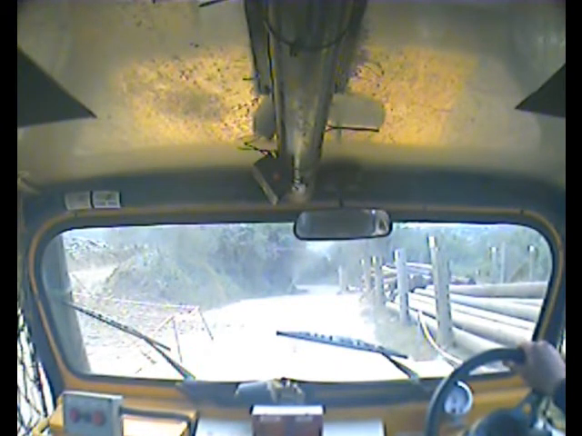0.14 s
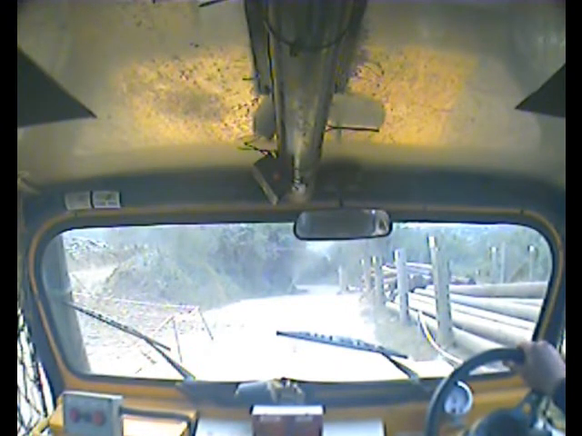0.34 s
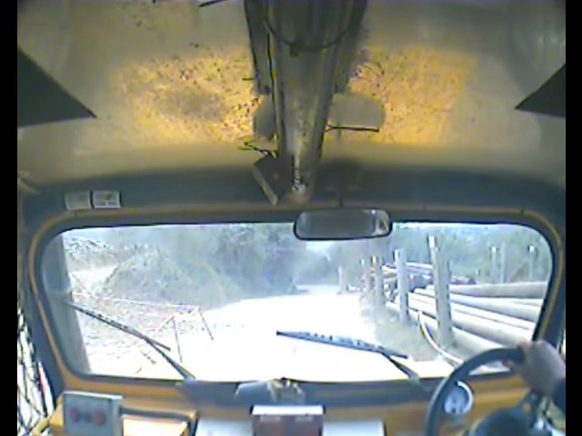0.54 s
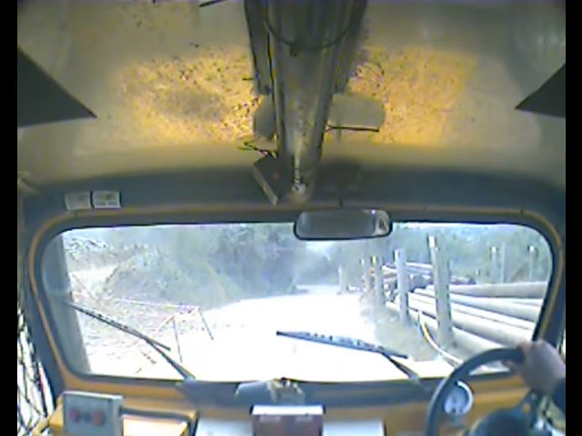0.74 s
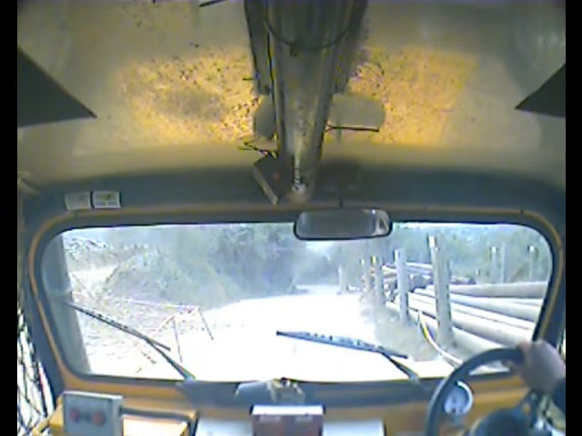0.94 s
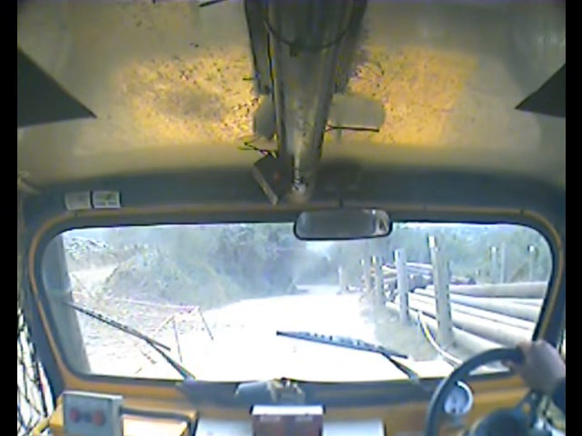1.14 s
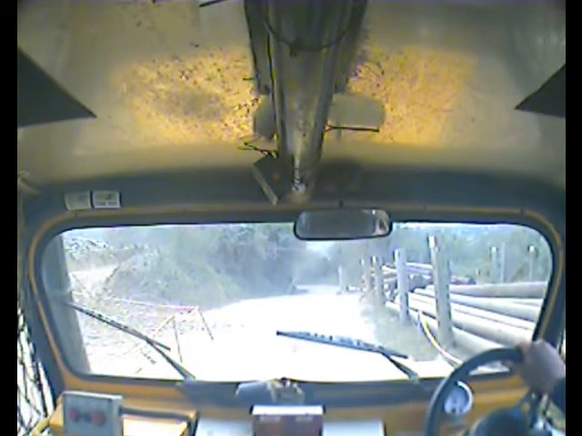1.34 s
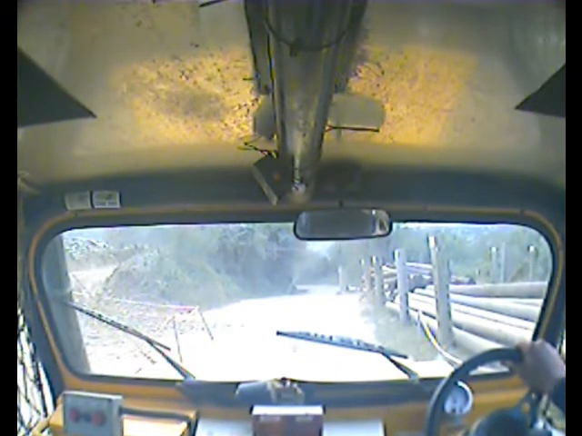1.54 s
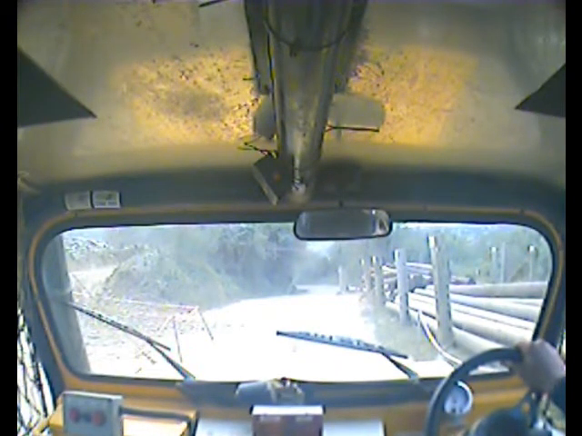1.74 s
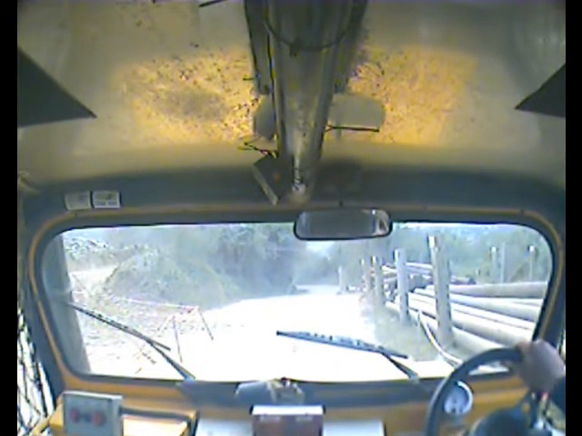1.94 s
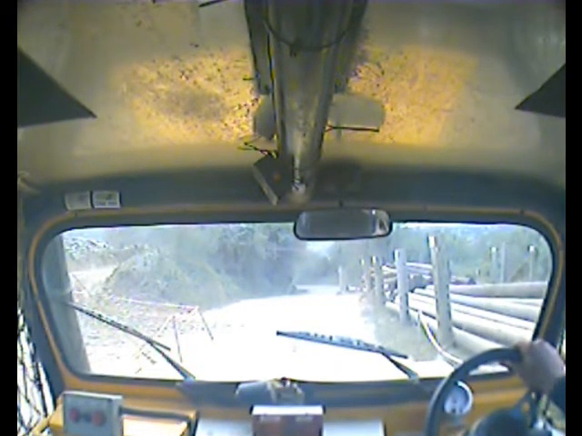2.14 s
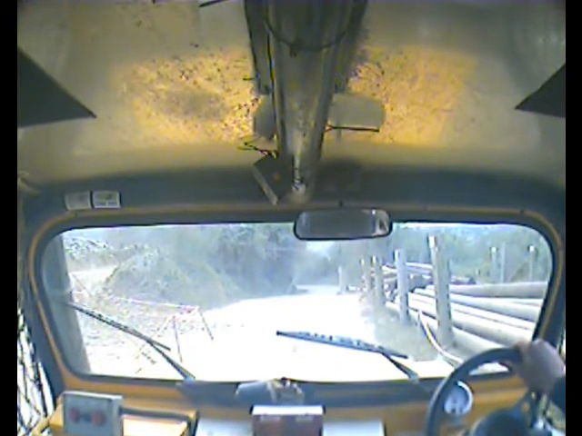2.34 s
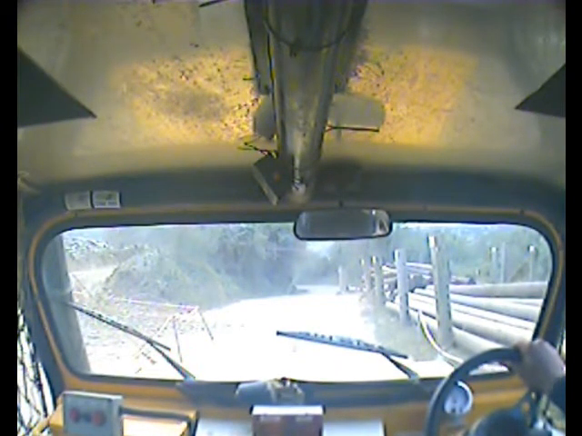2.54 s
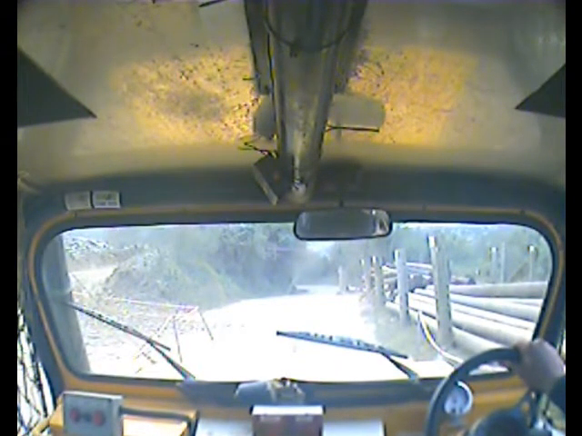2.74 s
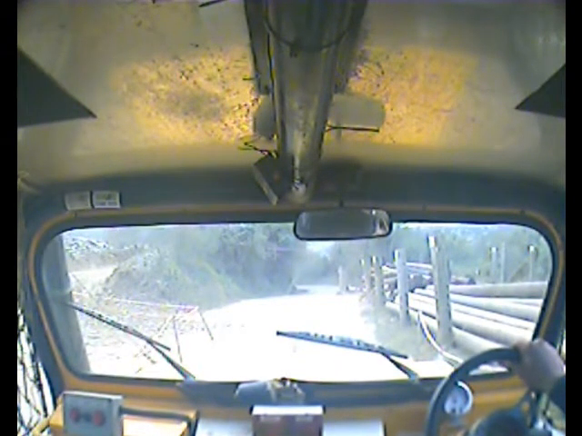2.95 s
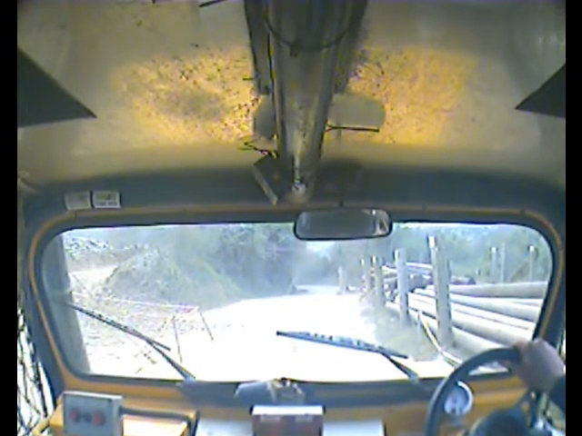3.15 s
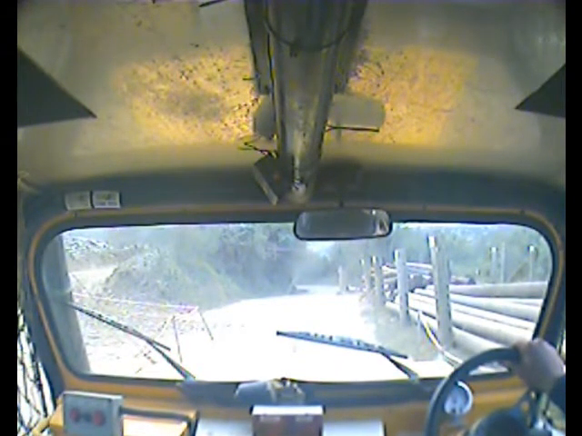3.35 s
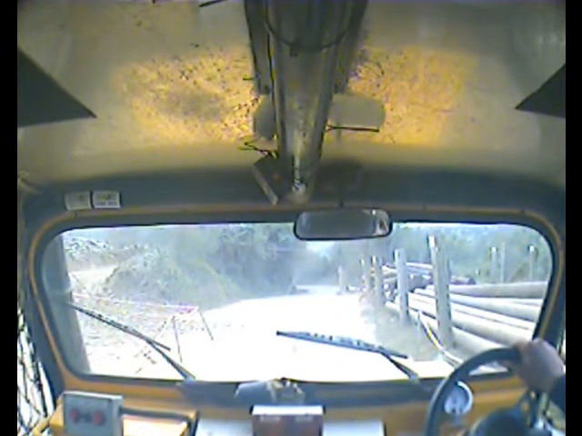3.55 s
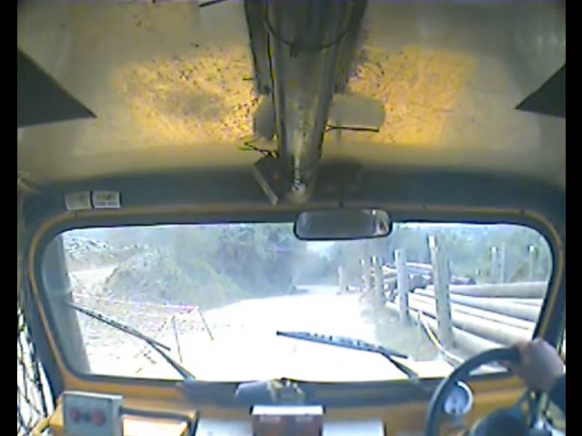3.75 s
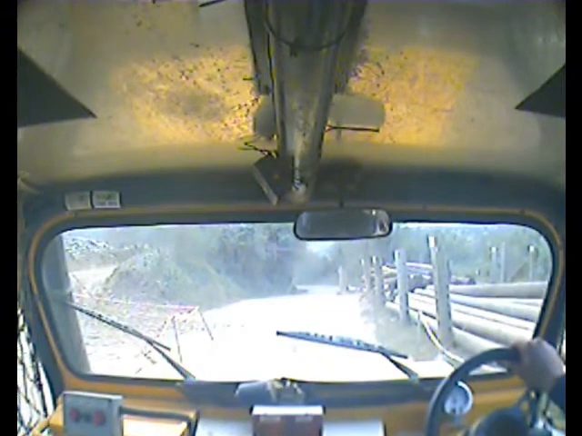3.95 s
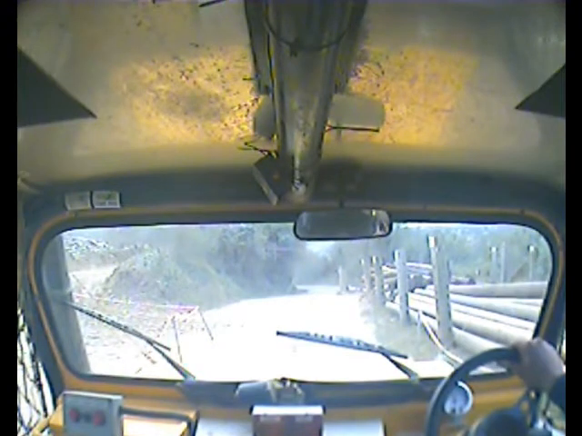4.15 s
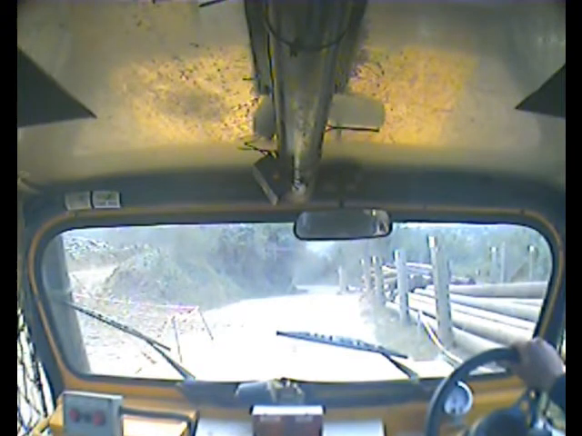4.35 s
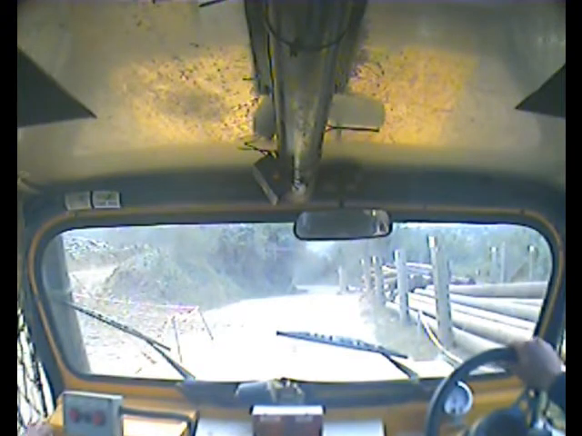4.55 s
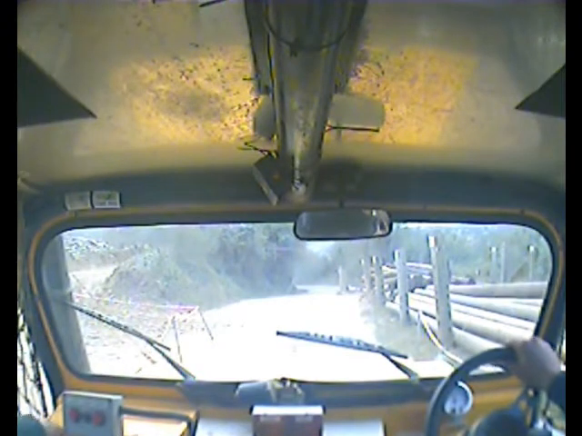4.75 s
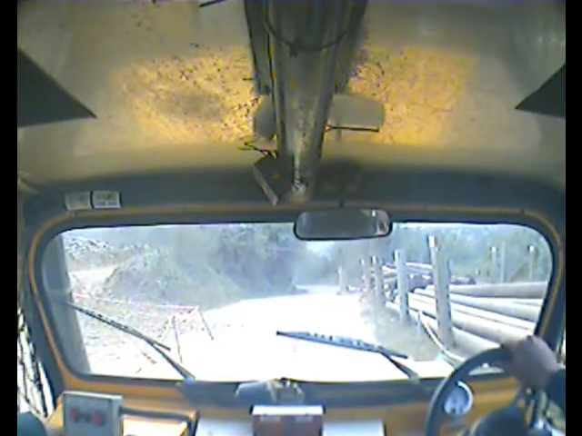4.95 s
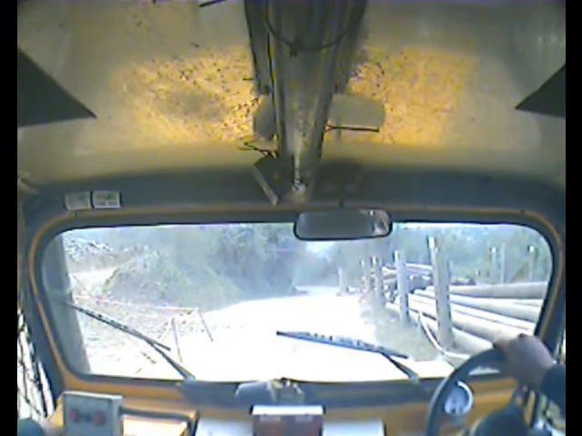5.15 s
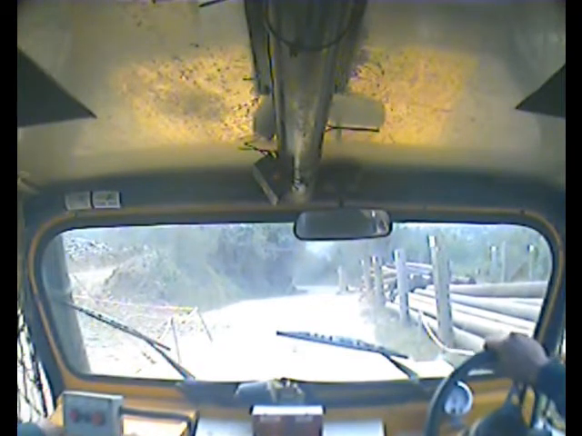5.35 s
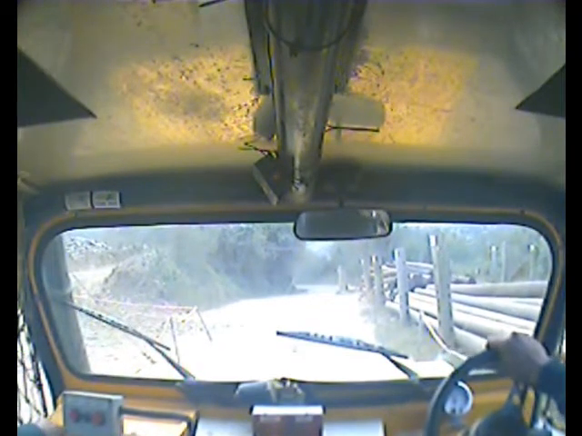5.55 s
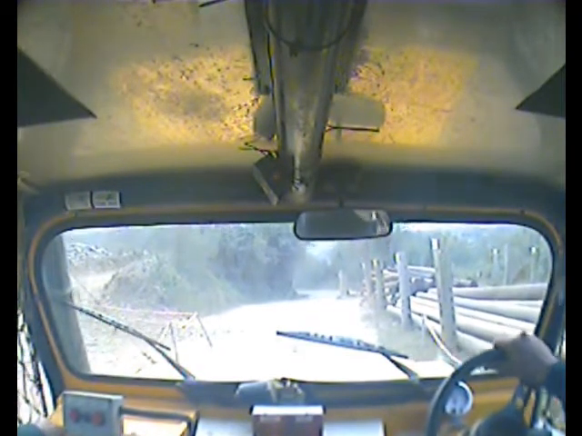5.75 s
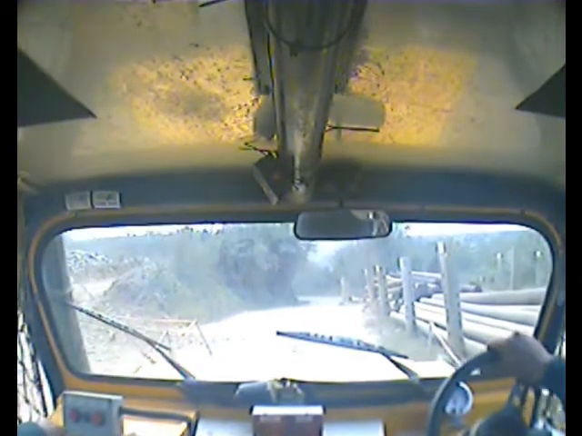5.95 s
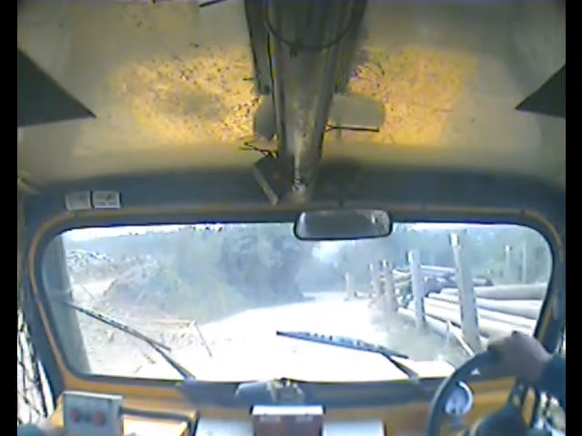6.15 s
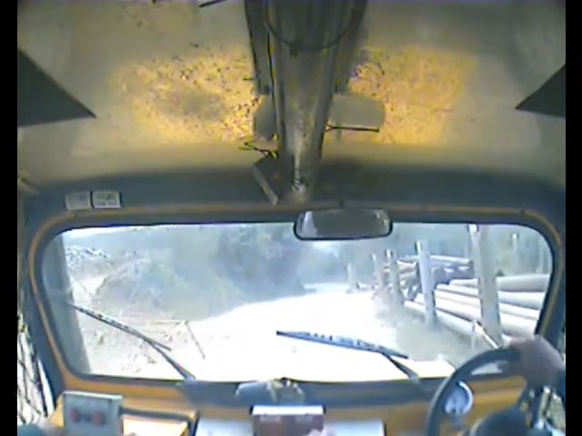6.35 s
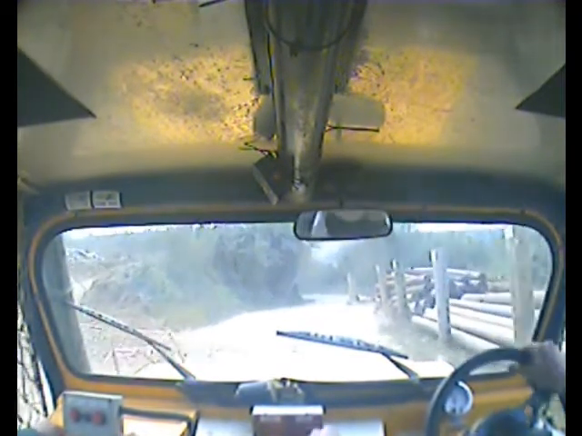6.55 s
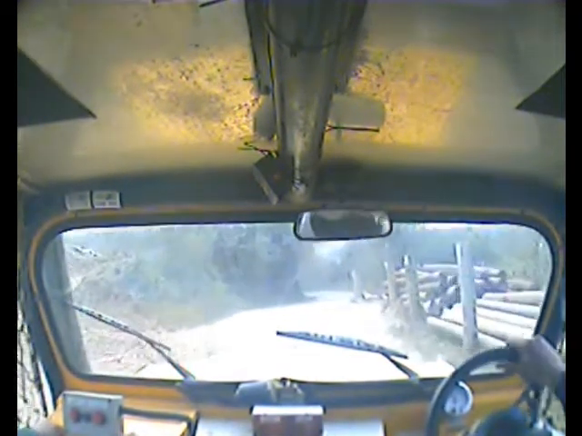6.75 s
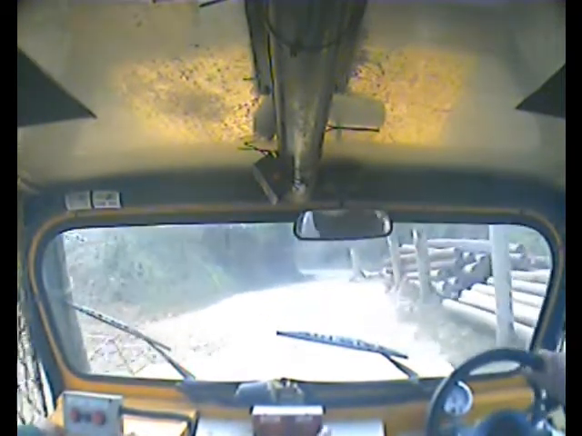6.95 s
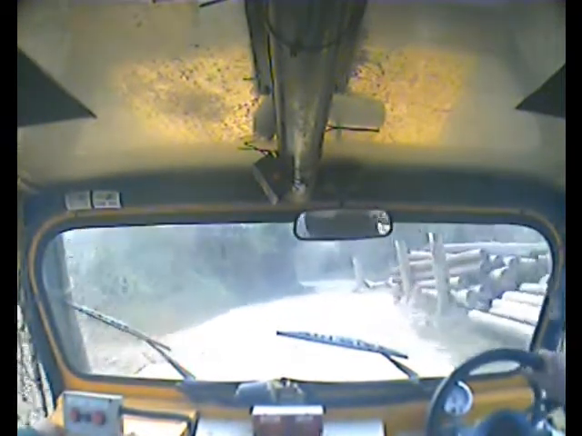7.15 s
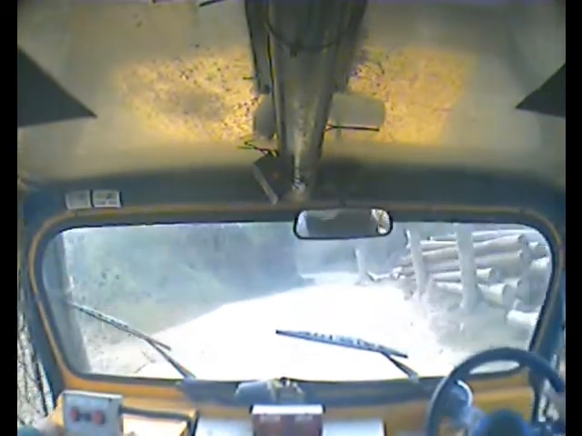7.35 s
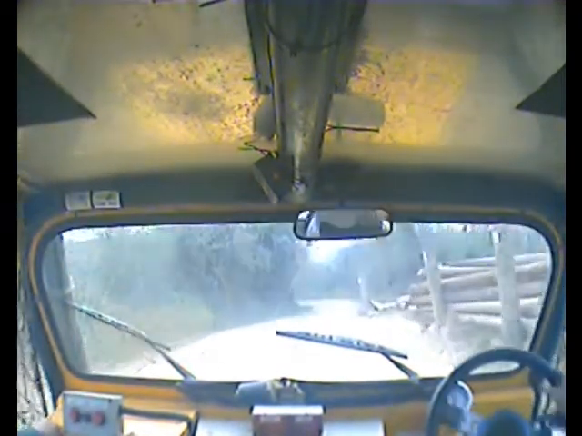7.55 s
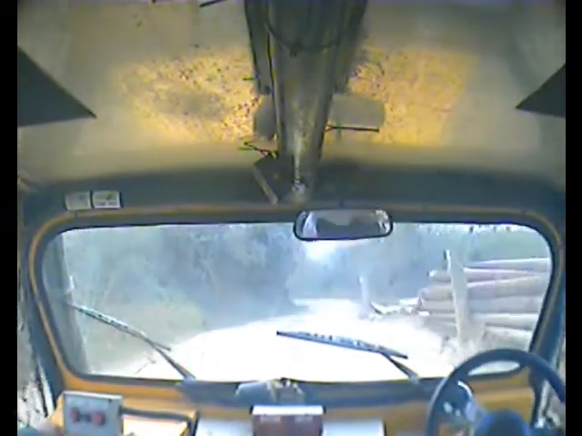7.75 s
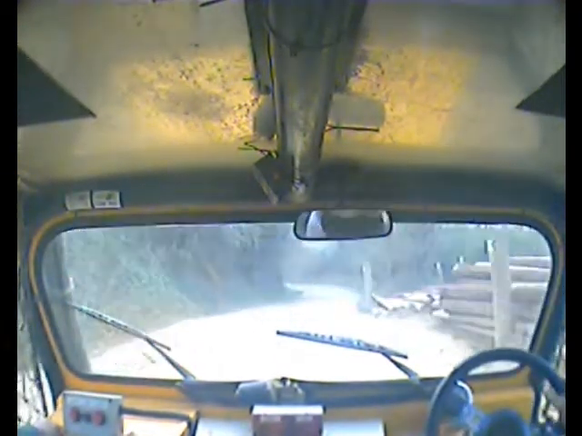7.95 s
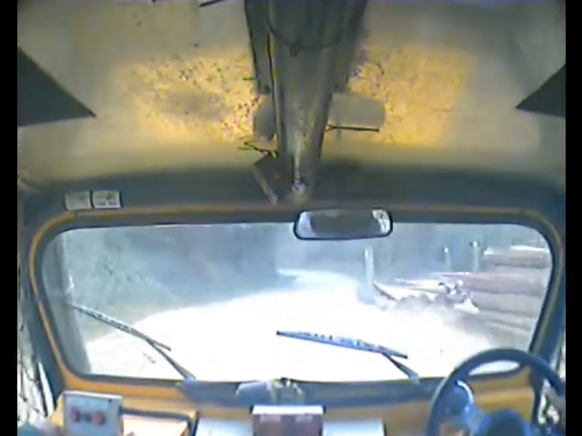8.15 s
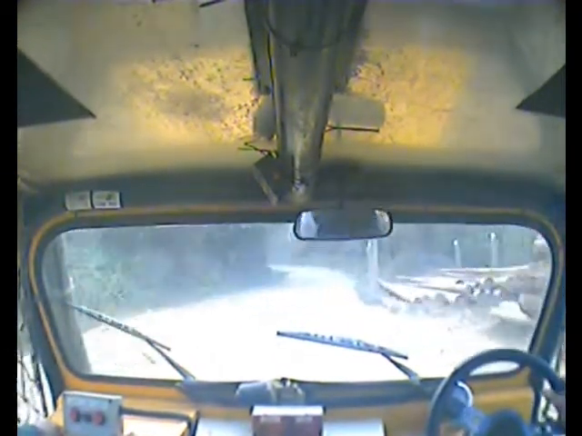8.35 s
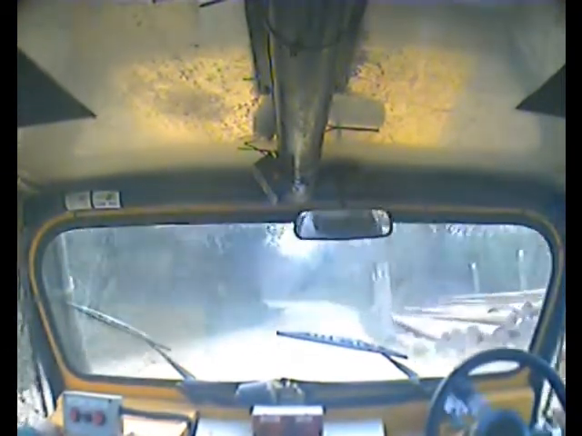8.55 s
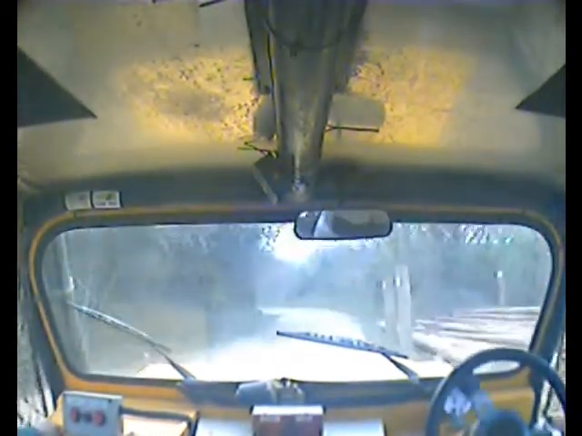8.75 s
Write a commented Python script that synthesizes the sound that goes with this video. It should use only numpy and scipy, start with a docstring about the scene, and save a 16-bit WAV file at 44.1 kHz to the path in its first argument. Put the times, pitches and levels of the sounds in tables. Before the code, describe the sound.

The microphone sits inside the bare, boxy cab of an eight-cylinder race car. From 0 to 5 seconds the engine idles fairly quietly, low and lumpy, with small growling throttle swells around 0.7 and 1.4-1.7 seconds before settling. Thin motor and pump whines hover above it, more noticeable from about 2.5 seconds. At 5.0 a short, grating gear clunk rings the casing. Around 5.5 the engine leaps into a loud roar, with a hard metallic clack and body thump near 5.7. Its pitch sags towards 6.4, snarls, then climbs strongly from 6.9 to a high, raspy peak around 8.2-8.4 before dropping slightly, still loud, at the end near 8.8. Low body boom swells with speed. Irregular dry metal rattles and bumps cluster around 6.4-7.4 and 8.1-8.6. The loudest moments clip harshly, and the extreme treble is cut off.

```python
"""Inside the bare cab of an eight-cylinder race car: the engine ticks over with two blips of throttle,
a gear clunks in, then it revs hard and pulls away over rough dirt. Engine orders are wavering sines;
boom, roar, rasp and hiss are noises coloured by throttle and cab. Wandering sines whine for a pump, noise
bursts clatter as loose metal, a noise burst shaped by casing modes is the clunk, and the input overloads."""
import sys
import numpy as np
from scipy import signal
from scipy.fft import rfft, irfft
from scipy.io import wavfile
from scipy.ndimage import uniform_filter1d, map_coordinates

SR = 44100
rng = np.random.default_rng(int(sys.argv[2]) if len(sys.argv) > 2 else 0)


def elevation(decibels):
    """Turn decibel levels (scalar or array-like) into linear amplitude ratios."""
    levels = np.asarray(decibels, float)
    return 10 ** (levels / 20)


def unload_wav(signal):
    """Save mono or channel-first audio to the path in sys.argv[1] as 16-bit WAV at rate SR, clipped to [-1, 1]."""
    wavfile.write(
        sys.argv[1],
        SR,
        np.round(np.clip(np.atleast_2d(signal).T, -1, 1) * 32767).astype(np.int16),
    )


N = 388521

# colour of the engine roar, idling and under load: (frequency [Hz], relative density [dB per Hz])
ROAR_IDLE_COLOUR = [(65, -22), (110, -5.5), (183, -6.5), (282, -12), (350, -7), (426, -12.5), (513, -7.5),
                    (605, -16), (767, -10), (924, -10), (994, -9.5), (1120, -20), (1300, -16.5),
                    (1690, -51), (2860, -120)]
ROAR_LOAD_COLOUR = [(65, -38), (110, -9), (141, -9), (177, -0.5), (215, -14.5), (262, -1.5), (291, -4),
                    (346, -1), (477, -6.5), (535, -5.5), (678, -7.5), (963, -6.5), (1300, -18), (1690, -28),
                    (2860, -120)]


def evened(x):
    """Scales to rms 1."""
    return x / np.sqrt(np.mean(x ** 2) + 1e-20)


def read(points, hz):
    """Reads a spectrum on a log-frequency axis."""
    f, value = np.transpose(points)
    return np.interp(np.log(hz + 1), np.log(f + 1), value)


def curves(rows, t):
    """Joins table rows by straight lines in time."""
    s, *columns = np.transpose(rows)
    return [np.interp(t, s, c, left=c[0], right=c[-1]) for c in columns]


def swells(rows, t):
    """Sum of bell-shaped lifts in dB."""
    return sum(db * np.exp(-((t - s) / half) ** 2) for s, half, db in rows)


def wander(hz):
    """Slow random drift of about rms 1 up to about hz."""
    knots = rng.standard_normal(int(N / SR * hz * 2) + 4)
    coarse = np.arange(0, N + 64, 64)
    drift = map_coordinates(knots, [coarse / SR * hz * 2 + 1], order=3)
    return np.interp(np.arange(N), coarse, drift)


def add(mix, s, sound):
    """Mixes a sound in at time s."""
    part = mix[round(s * SR):][:len(sound)]
    part += sound[:len(part)]


def resonances(modes, hz):
    """Bell curves of (frequency [Hz], width [Hz], peak height) at each frequency, summed."""
    return sum(height / (1 + (2 * (hz - f) / width) ** 2) for f, width, height in modes)


def cab_db(hz):
    """Lift in dB that the air and panel resonances of the cab give at each frequency."""
    # cab resonances: (frequency [Hz], width [Hz], lift [dB])
    cab_modes = [(43, 7.6, 2.5), (78, 8.8, 2.5), (164.3, 5.1, 4), (183.4, 24, 12.5), (325, 10, 3.5),
                 (523, 20, 2), (795, 40, 2.5), (1050, 44, 1), (1864, 43, 7), (4180, 78, 5.5),
                 (5270, 250, 1.5), (6900, 150, 4.5), (425.5, 17, 4.5), (651, 17, 5.5), (1180, 15, 7),
                 (1220, 32, -0.5), (1680, 40, 4.5)]
    return resonances(cab_modes, hz)


def effort_db(t):
    """Engine effort in dB over idle."""
    # engine effort: (time [s], level over idle [dB])
    effort = [(0, 0), (5.3, 0), (5.42, 1), (5.54, 9), (5.63, 14.5), (5.85, 13.5), (6.3, 14), (6.5, 15),
              (6.6, 13), (6.85, 13.5), (7.15, 17), (7.3, 20), (7.55, 17.5), (7.7, 18), (8.0, 20), (8.2, 22),
              (8.4, 20.5), (8.55, 21.5), (8.72, 17.5), (8.81, 22)]
    return curves(effort, t)[0]


def throttle(t):
    """Share of open throttle, 0-1, taken from the effort."""
    wide_open_db = 14
    return np.clip(effort_db(t) / wide_open_db, 0, 1)


def blips_db(t):
    """Lift in dB from the dabs of throttle that make the intake growl."""
    # dabs of throttle: (time [s], half length [s], growl lift [dB])
    dabs = [(0.744, 0.1, 5.5), (1.408, 0.11, 5.5), (1.65, 0.11, 5)]
    return swells(dabs, t)


def snarl_db(t):
    """Lift or dip in dB as the upper roar snarls or dulls for a while."""
    # snarls: (time [s], half length [s], lift [dB])
    snarl_moments = [(5.54, 0.08, 1), (5.72, .08, 1.5), (6.48, 0.074, 8), (7.05, 0.15, -2),
                     (7.3, 0.076, -1.5), (7.55, 0.15, 1.5), (7.95, 0.31, 6), (8.5, 0.18, -0.5),
                     (8.25, 0.074, -4)]
    return swells(snarl_moments, t)


def roar_level_db(t):
    """Level of the roar, which follows the full effort and part of each blip."""
    return -38 + effort_db(t) + 0.4 * blips_db(t)


def colour_db(idle, load, hz, t, snarls):
    """Spectrum between idle and load, lifted by the cab and, for engine roar, by snarl and growl."""
    snarl_hz, growl_hz, growl_width_hz = 580, 328, 160
    open_share = throttle(t)
    engine_db = read(idle, hz) * (1 - open_share) + read(load, hz) * open_share
    snarl = snarls * snarl_db(t) / (1 + (snarl_hz / (hz + 1)) ** 4)
    growl = snarls * blips_db(t) / (1 + (2 * (hz - growl_hz) / growl_width_hz) ** 4)
    return engine_db + cab_db(hz) + snarl + growl


def noise(idle, load, patchy_db, size, snarls=False):
    """Noise whose colour follows the throttle, with drifting patches, evened to rms 1."""
    hop = size // 4
    frames, hz = N // hop + 5, np.fft.rfftfreq(size, 1 / SR)
    real, imaginary, patches = rng.standard_normal((frames, len(hz), 3)).T
    patches = uniform_filter1d(patches, size=9, axis=0)
    patches = evened(uniform_filter1d(patches, size=5, axis=1))
    frame_s = np.arange(frames) * hop / SR
    colour = elevation(colour_db(idle, load, hz[:, None], frame_s, snarls))
    colour /= np.sqrt((colour ** 2).sum(0))  # equal power in every frame
    z = (real + 1j * imaginary) * colour * elevation(patchy_db * patches)
    return evened(signal.istft(z, nperseg=size, noverlap=size - hop)[1][:N])


def tone(turns, db, waver_db, waver_hz, slip):
    """A sine on a phase track whose phase drifts [rad] and whose level wavers, dipping deeper than it rises."""
    level_db = db + waver_db * np.minimum(wander(waver_hz), 1)
    phase = 2 * np.pi * (turns + rng.random()) + slip * wander(waver_hz)
    return np.sqrt(2) * elevation(level_db) * np.sin(phase)


def pump(t):
    """Thin whines of the pump and fan motors: sines with small drifts of phase and level."""
    # steady motor tones: (frequency [Hz], level [dB])
    motor_tones = [(748, -54.5), (996, -51), (1494, -60.5), (2740, -58), (3068, -64)]
    # two wandering pump tones: (time [s], frequency [Hz], level [dB])
    low_whine = [(0, 2773, -68), (2.2, 2756, -66), (3, 2770, -53.5), (4, 2770, -50.5), (4.7, 2775, -51),
                 (4.95, 2750, -63), (5.2, 2770, -53), (5.5, 2760, -61)]
    high_whine = [(0, 2870, -71), (1.3, 2910, -68), (2.8, 2880, -52), (3.9, 2860, -61), (5.5, 2880, -59)]
    out = sum(tone(hz * t, db, 0.78, 3.2, 0.27) for hz, db in motor_tones)
    for rows in (low_whine, high_whine):
        hz, db = curves(rows, t)
        out += tone(np.cumsum(hz) / SR, db, 0.9, 6, 0.17)
    return out


def clunk():
    """The gear dogs grate for a moment and ring the gearbox casing."""
    # gearbox casing modes: (frequency [Hz], width [Hz], level [dB])
    casing_modes = [(100, 80, 3), (330, 250, -2), (560, 250, 1), (860, 300, 1), (1250, 300, -3),
                    (2600, 1400, -13), (5300, 800, -22), (8000, 3000, -23)]
    start_s, level_db, rise_s, grate_s, t60_s = 5.02, -30.5, 0.0081, 0.03, 0.22
    out, t = np.zeros(N), np.arange(SR // 4) / SR
    hz = np.fft.rfftfreq(len(t), 1 / SR)
    casing = resonances([(f, width, elevation(db)) for f, width, db in casing_modes], hz)
    ring = evened(irfft(rfft(rng.standard_normal(len(t))) * casing, len(t)))
    decay = elevation(-60 * np.maximum(t - grate_s, 0) / t60_s)
    add(out, start_s, elevation(level_db) * ring * np.minimum(t / rise_s, 1) * decay)
    return out


def clatter():
    """Each jolt is a noise burst, as of many tiny metal contacts, that stops short with a brief tail."""
    # loose metal clatters: (time [s], nominal peak level [dB], length [s], lift below 4 kHz [dB])
    jolts = [(5.689, -25, 0.012, 0), (5.727, -8, 0.0092, 2), (6.409, -23, .01, 5), (6.455, -21, 0.053, 10),
             (6.727, -13.5, 0.007, -11), (6.841, -15.5, 0.02, -5), (6.876, -20, 0.0034, -12),
             (6.914, -16, 0.0064, -6), (6.996, -13, 0.002, -8), (7.203, -12, 0.012, -13),
             (7.371, -15, 0.0046, 11), (7.441, -20, .006, -8), (8.093, -20, .006, -6),
             (8.113, -14, 0.0087, 0), (8.253, -15.5, 0.0095, -1), (8.304, -9.5, 0.0067, 4),
             (8.387, -8.5, 0.0067, 2.5), (8.481, -11, 0.013, 3.5), (8.522, -23, 0.01, -10),
             (8.637, -24, .008, -6)]
    # colour of the loose metal: (frequency [Hz], relative level [dB])
    metal_colour = [(900, -40), (1500, 6), (3000, -1.5), (4200, -12), (5300, 1), (6500, 0.5), (8000, 3),
                    (9500, -2), (11000, -14)]
    rolling_s, rattles, rattle_db = 5.9, 20, -26  # small rattles at random once rolling
    tilt_spread_db = 1.5  # chance brightness above 4 kHz, dB per octave
    out, t = np.zeros(N), np.arange(4096) / SR
    hz = np.fft.rfftfreq(len(t), 1 / SR)
    small = [(s, rattle_db, .007, -5) for s in rng.uniform(rolling_s, N / SR, rattles)]
    for s, db, length, knock_db in jolts + small:
        tilt_db = tilt_spread_db * rng.standard_normal() * np.log2((hz + 1) / 7000)
        lean_db = np.where(hz < 4000, knock_db, tilt_db)
        colour = elevation(read(metal_colour, hz) + cab_db(hz) + lean_db)
        burst = 0.27 * evened(irfft(rfft(rng.standard_normal(len(t))) * colour))
        body = np.exp(-(t / max(length, .002)) ** 1.8)
        tail = 0.079 * np.exp(-t / 0.01)
        add(out, s, elevation(db) * burst * np.minimum(t / 0.00019, 1) * (body + tail))
    return out


def body_boom(t):
    """Low noise of the body that grows as the car gathers speed, with bumps thumping it."""
    # colour of the boom: (frequency [Hz], relative density [dB per Hz])
    boom_colour = [(12, -40), (22, -12), (30, 0), (40, 5), (55, -0.5), (75, 0), (105, -5), (130, -11),
                   (170, -17), (290, -100)]
    # level of the boom: (time [s], level [dB])
    boom_level = [(0, -41), (1.8, -43), (2.5, -35), (4.9, -36.5), (5.25, -40), (5.6, -37), (6.3, -33),
                  (7.1, -28.5), (7.8, -25), (8.81, -19.5)]
    # bumps: (time [s], half length [s], lift [dB])
    bumps = [(5.75, .07, 9), (6.48, .12, 6.5), (7.42, 0.064, 7.5), (7.7, .06, -1), (8.11, .06, 5),
             (8.27, 0.041, 3), (8.75, .05, 1)]
    level_db = curves(boom_level, t)[0] + swells(bumps, t)
    return elevation(level_db) * noise(boom_colour, boom_colour, 0.53, size=8192)


def puffs(turns, depth):
    """Each of the eight exhaust pulses in a cycle carries a puff of turbulence."""
    return 1 + depth * np.cos(2 * np.pi * 8 * turns)


def hiss(t, turns):
    """Treble noise of the engine, flickering in all bands at once and more so on open throttle."""
    # colour of the hiss, idling and under load: (frequency [Hz], relative density [dB per Hz])
    idle_colour = [(2120, -35), (3600, 7), (3870, -13), (4060, 2), (4240, 0.5), (4620, -3), (5110, 3.5),
                   (6350, -4.5), (7130, -0.5), (8640, 2), (9240, -4), (9690, -10), (10500, -12),
                   (11100, -14), (11400, -27), (14800, -57), (22000, -120)]
    load_colour = [(2120, -16), (3600, 1.5), (3760, -6), (4280, -5.5), (5600, -2.5), (6200, -3.5),
                   (7160, -1), (8390, 1), (9150, -4), (10100, -14), (10700, -10.5), (11000, -14),
                   (11400, -21), (14800, -53), (22000, -120)]
    level_db = -54.25 + 0.86 * effort_db(t) + 0.17 * snarl_db(t)
    flicker_db = (0.62 + 0.2 * throttle(t)) * wander(30)
    return elevation(level_db + flicker_db) * noise(idle_colour, load_colour, 1.8, size=512) * puffs(turns, 0.085)


def rasp(t, turns):
    """Upper-mid noise of the engine that follows most of the effort and half the snarl."""
    # colour of the rasp, idling and under load: (frequency [Hz], relative density [dB per Hz])
    idle_colour = [(650, -48), (1100, 2.5), (1150, -11), (1250, -7), (1590, -4), (1880, -2.5), (2100, -6),
                   (2540, -5.5), (2800, -2.5), (3380, -3), (3690, -41), (3890, -19), (4000, -14.5),
                   (5200, -44), (8800, -120)]
    load_colour = [(650, -17), (1100, -9), (1220, -3), (1370, -2.5), (1660, -5.5), (1810, -3.5), (2180, -7),
                   (2830, -12.5), (3210, -8.5), (4000, -37), (5200, -57), (8800, -120)]
    level_db = -46.97 + 0.78 * effort_db(t) + 0.5 * snarl_db(t)
    flicker_db = 0.87 * wander(18)
    return elevation(level_db + flicker_db) * noise(idle_colour, load_colour, 0.83, size=1024) * puffs(turns, 0.1)


def roar(t, turns):
    """Broad exhaust noise that snarls, growls and throbs with each firing."""
    sound = noise(ROAR_IDLE_COLOUR, ROAR_LOAD_COLOUR, 0.99, size=2048, snarls=True)
    return elevation(roar_level_db(t)) * sound * puffs(turns, 0.14)


def weak_orders(t, hz, turns, strain):
    """Sines at weaker orders from uneven cylinders, which take the level and colour of the roar."""
    # weaker orders: (multiple of the cycle rate, level relative to one another [dB])
    order_rows = [(2, -7), (4, -4), (7, -7), (9, 1.5), (10, 6), (11, 3), (12, 1), (13, 1), (15, -10),
                  (17, 1.5), (18, 4), (20, 5.5), (21, -2), (22, 4.5), (23, 4.5), (25, 8), (26, -0.5),
                  (27, 2.5), (28, 0.5), (29, 4), (30, 4.5), (32, 8), (33, 0), (35, 3.5), (37, 5.5), (40, 6),
                  (43, 5), (48, 4)]
    out, slow = np.zeros(N), t[::256]
    for k, db in order_rows:
        order_hz = np.maximum(k * hz[::256], 140)
        passed_db = colour_db(ROAR_IDLE_COLOUR, ROAR_LOAD_COLOUR, order_hz, slow, True)
        level_db = roar_level_db(t) - 10 - 3.3 * strain + db + np.interp(t, slow, passed_db)
        out += tone(k * turns, level_db, 3.4, 12, 0.013 * k * strain + 0.28)
    return out


def strong_orders(t, hz, turns, strain):
    """Sines at the strong orders, crossing from idle to load levels that exhaust and cab pass unevenly."""
    # strong orders: (multiple of the cycle rate, idle level [dB], load level before the pipe [dB],
    # rise of the load level with revs [dB per octave])
    order_rows = [(7.996, -42.5, -16.5, -2), (16.02, -45.5, -19, -4), (24.04, -54, -38.5, 21.5),
                  (6, -48, -25, -2), (4.99, -43, -27.5, 8), (3.006, -41.5, -29, 8), (14.02, -56, -23.5, 4),
                  (19.1, -59, -22.5, -5)]
    # exhaust and cab response: (frequency [Hz], gain [dB])
    pipe = [(40, -13), (75, -3.5), (115, -15), (135, -8.5), (150, -1), (167, -2.5), (186, 0), (202, -4),
            (238, -6), (265, -9.5), (308, -13), (335, -4), (365, -7), (388, -4), (404, -11.5), (436, -5.5),
            (480, -12), (538, -4.5), (580, -14), (612, -3), (640, -10.5), (715, -9), (860, -7.5), (960, -3),
            (1090, -17)]
    pull_hz = 200  # firing rate at which the load levels hold
    revs = np.log2(8 * hz / pull_hz)
    lead = throttle(t) ** 0.4  # the orders swell ahead of the roar as the throttle opens
    uneven = np.cos(2 * np.pi * turns)  # unequal cylinders spread each order into its neighbours
    out = np.zeros(N)
    for k, idle_db, load_db, rise_db in order_rows:
        ticking_db = idle_db + 0.7 * blips_db(t)
        pulling_db = load_db + rise_db * revs + read(pipe, k * hz)
        level_db = ticking_db * (1 - lead) + pulling_db * lead
        order = tone(k * turns, level_db, (0.62 + 0.11 * k) * strain, 7, 0.019 * k * strain)
        out += order * (1 + 0.013 * k * uneven)
    return out


def engine(t):
    """Orders of the engine cycle over roar, rasp and hiss that throb with each firing."""
    # engine speed, eight firings to a cycle: (time [s], firing rate [Hz])
    speed = [(0, 92), (.45, 95), (.95, 125), (1.35, 110), (1.8, 132), (2.35, 106), (3.2, 115.5),
             (4.1, 119.7), (5.33, 119), (5.48, 135), (5.74, 205), (6.12, 192), (6.44, 159), (6.9, 208.5),
             (7.27, 264), (7.45, 271), (7.6, 299), (7.85, 317), (8.22, 365), (8.36, 364), (8.53, 286),
             (8.68, 275), (8.81, 277)]
    hz = uniform_filter1d(curves(speed, t)[0], size=3500) / 8  # the flywheel rounds off changes
    turns = np.cumsum(hz) / SR
    strain = 1 + 1.3 * np.clip(hz / 30 - 1, 0, 1) ** .5  # high revs break the lines up
    noises = hiss(t, turns) + rasp(t, turns) + roar(t, turns)
    return noises + weak_orders(t, hz, turns, strain) + strong_orders(t, hz, turns, strain)


def scene():
    """Everything in the cab at one microphone."""
    t = np.arange(N) / SR
    return (pump(t) + clunk() + clatter() + body_boom(t) + engine(t))[None]


def roll_off(x):
    """The treble ends steeply here."""
    return signal.sosfilt(signal.butter(12, 11510, fs=SR, output="sos"), x)


def record(dry):
    """The microphone input clips hard and is then band-limited."""
    clip, edge_hz = 0.5, 11150
    edge = signal.firwin(511, edge_hz, window=("kaiser", 9), fs=SR)
    narrow = signal.oaconvolve(np.clip(dry, -clip, clip), edge[None], "same")
    return roll_off(narrow)


dry = scene()
out = record(dry)
unload_wav(out)
```